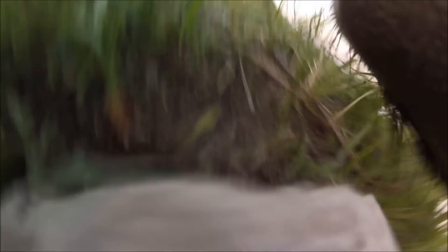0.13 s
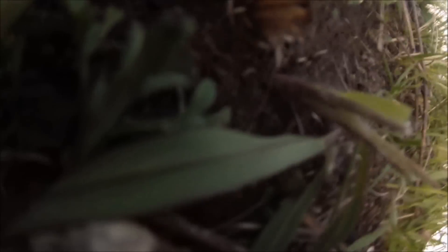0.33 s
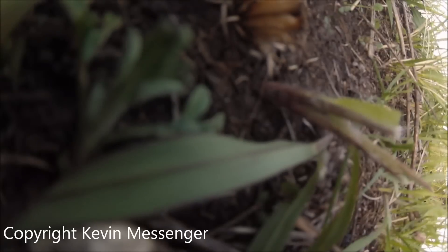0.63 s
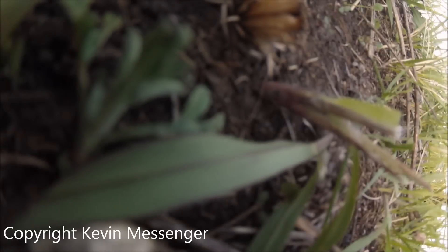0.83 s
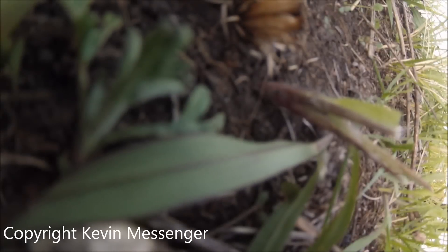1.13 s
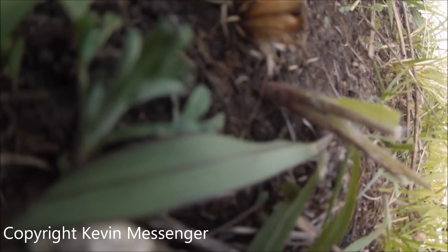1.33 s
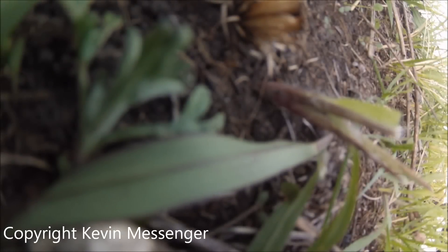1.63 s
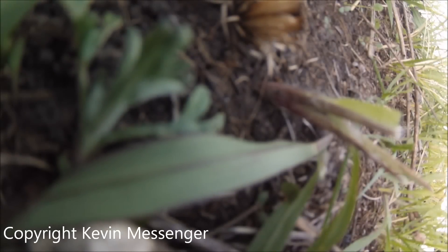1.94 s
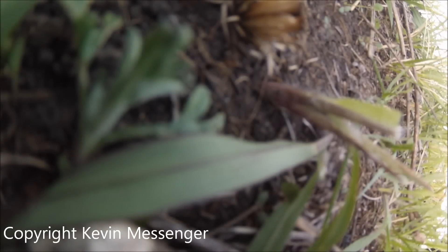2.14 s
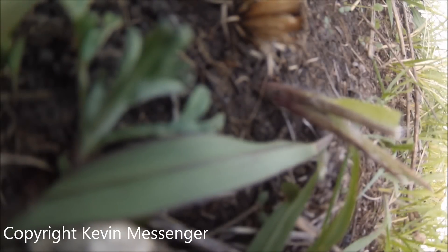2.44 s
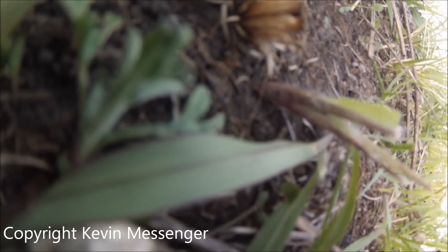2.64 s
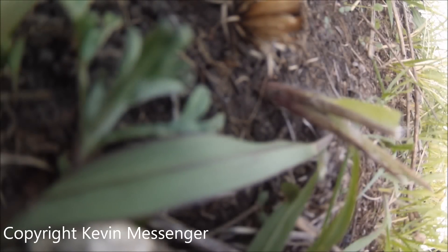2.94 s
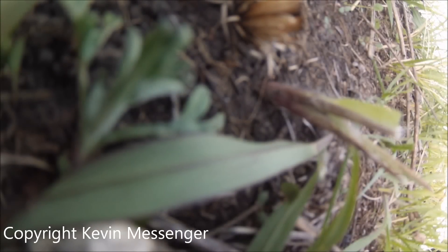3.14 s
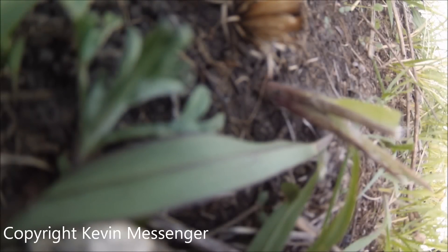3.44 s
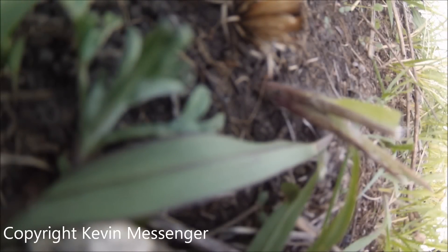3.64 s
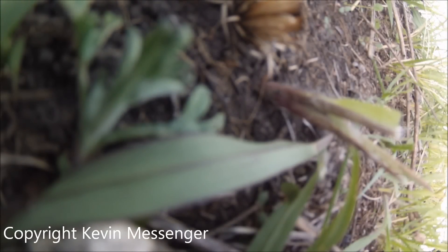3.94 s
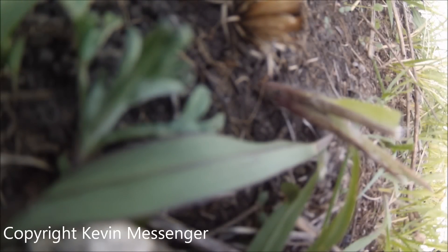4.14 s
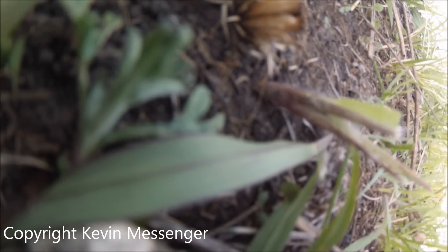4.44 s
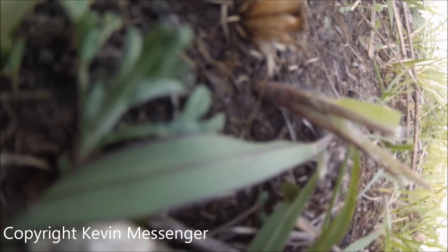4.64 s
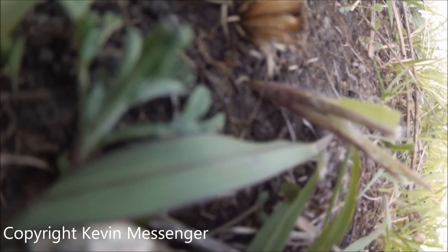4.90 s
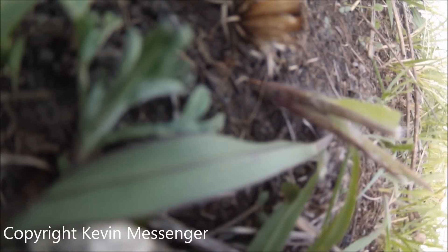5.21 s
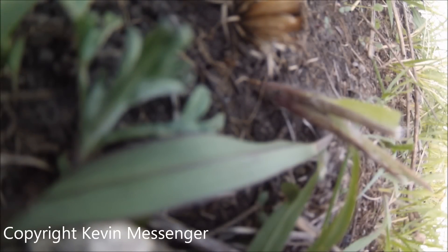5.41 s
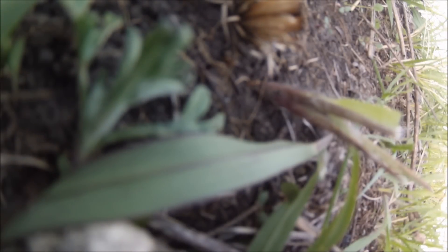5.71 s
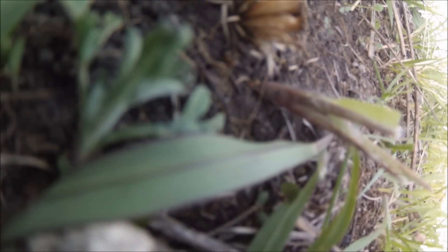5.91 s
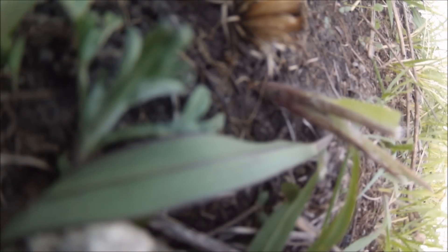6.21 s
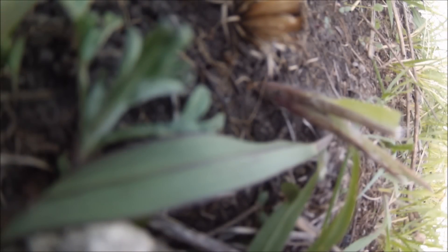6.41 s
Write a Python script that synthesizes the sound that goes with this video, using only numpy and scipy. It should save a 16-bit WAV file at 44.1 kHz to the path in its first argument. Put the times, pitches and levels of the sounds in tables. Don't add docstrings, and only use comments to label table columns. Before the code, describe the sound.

A small camera is knocked over with loud scraping, hollow thumps and cracks, then lies still while a plover gives rapid, shrill alarm calls.

```python
import sys
import numpy as np
from scipy import signal
from scipy.fft import rfft, irfft
from scipy.io import wavfile
from scipy.ndimage import uniform_filter1d, map_coordinates

SR = 44100
rng = np.random.default_rng(int(sys.argv[2]) if len(sys.argv) > 2 else 0)


def store_wav(level_fs):
    pcm = np.round(np.clip(np.atleast_2d(level_fs), -1, 1) * 32767)
    wavfile.write(sys.argv[1], SR, pcm.T.astype(np.int16))


def invert_db(x):
    u = np.asarray(x, float) / 20
    return 10 ** u


N = 289296
TIME = np.arange(N) / SR


def rms_one(x):
    return x / np.sqrt(np.mean(x ** 2) + 1e-20)


def in_time(rows, t):
    s, *columns = np.transpose(rows)
    return [np.interp(t, s, c) for c in columns]


def coloured(x, spectrum):
    hz, db = np.transpose(spectrum)
    log_hz = np.log(np.fft.rfftfreq(N, 1 / SR) + 1)
    gain = invert_db(np.interp(log_hz, np.log(hz), db))
    return rms_one(irfft(rfft(x) * gain, N))


def drift(rate_hz):
    r = np.exp(-2 * np.pi * rate_hz / SR)
    noise = rng.standard_normal(N + SR)
    return rms_one(signal.lfilter([1], [1, -2 * r, r * r], noise)[SR:])


def ring(clicks, hz, t60_s):
    r = np.exp(-np.log(1000) / (t60_s * SR))
    w = 2 * np.pi * hz / SR
    return signal.lfilter([0, np.sin(w)], [1, -2 * r * np.cos(w), r * r], clicks + 1e-18)


def clicks_at(seconds, gains):
    out = np.zeros(N)
    out[(np.asarray(seconds) * SR).astype(int)] = gains
    return out


RELEASE_S = .009
REST_HZ, DROOP_SHARE, DROOP_S = 3650, 0.66, .015


def arch(start, length, first, turning, last, turn, hold):
    t = np.arange(start, start + length + RELEASE_S / 2, 1 / SR)
    share = (t - start) / length
    glide = np.sin(np.pi / 2 * np.clip(share / turn, 0, 1) ** hold) ** 2
    bend = np.clip((share - turn) / (1 - turn), 0, 1) ** 2
    droop = DROOP_SHARE * (last - REST_HZ) * np.exp((t - start - length) / DROOP_S)
    return t, first + (turning - first) * glide + (last - turning) * bend - droop


MIXING = [(2, -1), (2, 1), (1, 1), (3, -1), (3, -2), (0, 3)]
MIXING_DB = [2, 4, -3.5, -22, -2.5, -18]
# time_s, level_db
NEARNESS = [(0, -35.5), (.475, -47.5), (.608, -37), (.781, -41), (.968, -45), (1.181, -53.5), (1.55, -62),
            (1.876, -58.5), (2.18, -52), (2.436, -47), (3.038, -46.5), (3.46, -45.5), (3.648, -47),
            (3.814, -46.5), (4.002, -42.5), (5.824, -43), (6.33, -42)]
# start_s, pitch_hz, level_db (against nearness)
LOWER = [(.608, 1080, -21), (.781, 1300, -14), (.968, 1207, -22.5), (1.181, 1300, -30), (2.18, 1100, -45),
         (2.436, 1040, -28.5), (2.636, 1099, -21.5), (3.46, 1071, -21), (3.648, 1160, -20),
         (3.814, 1212, -22), (4.002, 1090, -21.5), (4.664, 1075, -20), (4.82, 1087, -31.5),
         (5.036, 1050, -37), (5.272, 1026, -21.5), (5.644, 1077, -19), (5.824, 1095, -30),
         (6.33, 1093, -32)]
# pitch_hz, level_db
GROUND_ECHO = [(3430, -17), (3520, -1.5), (3600, -3), (3800, -1.5), (3950, -4.5), (4190, -14), (4320, -7),
               (4520, -3.5)]
# pitch_hz, level_db
FUNDAMENTAL = [(1720, -27.5), (1850, -22.5), (2000, -16), (2260, -9)]
LANDING_S = .44
THIRD_DB, AIR_DB, FLUTTER_DB, WOBBLE_HZ, ATTACK_S = -26, -3.0, 1.5, 7.0, .007
SCOOP_HZ, SCOOP_SHARE, SCOOP_S = 170.0, 0.2, .006
HIGH_EXIT_DB, HIGH_EXIT_S = -10.0, .012
EXIT_DB, EARLY_EXIT_S = -12.5, 0.0071
LOWER_CLIMB_HZ_PER_S, LOWER_ENTRY_S, LOWER_FADE_DB_PER_S = 450.0, 0.014, 30.5
CHOKE_HZ, CHOKE_DB_PER_S = 4200, 200.0
TAIL_HZ, TAIL_DB, TAIL_S = 200.0, 6, .014
SUM_FOLLOWS, SUM_LIFT_DB = 0.52, 1.5


def two_voices(t, hz, start, end, wobble, flutter, jitter, air):
    hz = hz - (SCOOP_HZ + SCOOP_SHARE * (hz[0] - REST_HZ)) * np.exp((start - t) / SCOOP_S)
    near_db = in_time(NEARNESS, start)[0]
    low_hz, low_db = in_time(LOWER, start)
    height = np.clip((hz.max() - 3850.0) / 400.0, 0, 1)
    forced = height * np.clip((near_db + 47.0) / 4.0, 0, 1)
    strain = np.clip((hz - 3800.0) / 510.0, .1, 1)
    tail = forced * np.exp((t - end) / TAIL_S)

    exit_db = EXIT_DB * np.exp((t - end) / EARLY_EXIT_S)
    echo_db = (start > LANDING_S) * in_time(GROUND_ECHO, hz)[0]
    main_db = near_db + echo_db + height * HIGH_EXIT_DB * np.exp((t - end) / HIGH_EXIT_S)
    fund_db = near_db + in_time(FUNDAMENTAL, hz / 2)[0] + exit_db
    mix_db = near_db + low_db + (1 - forced) * exit_db + TAIL_DB * tail
    mix_db += EXIT_DB * np.exp((start - t) / LOWER_ENTRY_S) - LOWER_FADE_DB_PER_S * (t - start)
    mix_db -= CHOKE_DB_PER_S * np.cumsum(np.clip((hz - CHOKE_HZ) / 600.0, 0, 1)) / SR

    low_hz = low_hz + LOWER_CLIMB_HZ_PER_S * (t - max(start, 0)) + TAIL_HZ * tail
    upper = np.pi * np.cumsum(hz + WOBBLE_HZ * wobble) / SR
    lower = 2 * np.pi * np.cumsum(low_hz + 45.0 * strain * jitter) / SR

    whistle = invert_db(main_db) * (np.sin(2 * upper) + invert_db(THIRD_DB) * np.sin(3 * upper))
    whistle += invert_db(fund_db) * np.sin(upper)
    mixed = sum(invert_db(db) * np.sin(a * upper + b * lower) for (a, b), db in zip(MIXING, MIXING_DB))
    sum_change = invert_db(SUM_FOLLOWS * echo_db + SUM_LIFT_DB) - 1
    mixed += sum_change * invert_db(MIXING_DB[1]) * np.sin(2 * upper + lower)
    mixed += invert_db(AIR_DB) * strain * air
    voice = whistle + invert_db(mix_db + FLUTTER_DB * flutter) * mixed
    rise = np.clip((t - start) / ATTACK_S, 0, 1)
    fall = np.clip((end - t) / RELEASE_S + .5, 0, 1)
    return np.sqrt(2) * voice * rise * fall


# start_s, length_s, first_hz, turning_hz, last_hz (second harmonic)
QUICK_CALLS = [(2.436, 0.12, 4223, 4264, 4670), (2.636, 0.14, 4307, 4383, 4610),
               (3.215, 0.16, 3890, 4447, 4300), (3.46, 0.13, 4004, 4210, 4200),
               (4.82, 0.097, 3570, 3454, 3610), (5.272, 0.1423, 3750, 4150, 3920),
               (5.468, 0.12, 3903, 3780, 3900), (5.824, 0.1, 3605, 3487, 3740)]
LINGERING_CALLS = [(0.781, 0.096, 4375, 4510, 4480), (0.968, 0.12, 3830, 4060, 4640),
                   (2.18, 0.17, 4126, 4380, 4550), (3.038, 0.11, 3960, 4400, 4430),
                   (4.186, 0.12, 3836, 3830, 3966), (4.352, 0.1, 3896, 3852, 3760),
                   (4.51, 0.1, 3743, 3840, 3726), (5.644, 0.11, 3840, 3748, 3864)]
SLOW_CALLS = [(0.608, 0.108, 4320, 4366, 4420), (1.876, 0.2, 3940, 4294, 4134),
              (2.86, 0.11, 4090, 4437, 4530), (3.648, 0.094, 3806, 3970, 3890),
              (3.814, 0.13, 3876, 4293, 4172), (4.002, 0.13, 3807, 3987, 4170),
              (4.664, 0.091, 3782, 3734, 3730), (5.036, 0.16, 3875, 4290, 4190)]
COVERED_CALLS = [
    (-.06, .115, 4300, 4215, 4120),
    (.475, .068, 4200, 4170, 4280),
]
# time_s, pitch_hz (second harmonic)
WAVERING_CALLS = [
    [(1.181, 3600), (1.243, 3705), (1.262, 3810), (1.286, 4150), (1.305, 4040), (1.333, 3780)],
    [(1.55, 3744), (1.571, 3760), (1.591, 3930), (1.635, 4030), (1.663, 3875), (1.708, 3945)],
    [(6.33, 4497), (6.352, 4547), (6.383, 3971), (6.417, 4115), (6.481, 4342), (6.52, 4286), (6.6, 4170)],
]
QUICK_TURN, LINGERING_TURN, SLOW_TURN = .31, 0.31, 0.62
QUICK_HOLD, LINGERING_HOLD, SLOW_HOLD = 1.12, 1.2, 1.5


def plover():
    out = np.zeros(N)
    wobble, flutter, jitter = drift(60.0), drift(30.0), drift(90.0)
    breath_band = signal.butter(2, [2000.0, 5600.0], "band", fs=SR, output="sos")
    air = rms_one(signal.sosfilt(breath_band, rng.standard_normal(N)))
    kinds = [(QUICK_CALLS, QUICK_TURN, QUICK_HOLD), (LINGERING_CALLS, LINGERING_TURN, LINGERING_HOLD),
             (COVERED_CALLS, LINGERING_TURN, LINGERING_HOLD), (SLOW_CALLS, SLOW_TURN, SLOW_HOLD)]
    calls = [arch(*row, turn, hold) for rows, turn, hold in kinds for row in rows]
    for curve in WAVERING_CALLS:
        t = np.arange(curve[0][0], curve[-1][0], 1 / SR)
        calls.append((t, uniform_filter1d(in_time(curve, t)[0], size=450, mode="nearest")))
    for t, hz in calls:
        start, end = t[0], t[-1] - RELEASE_S / 2
        inside = (t >= 0) & (t < TIME[-1])
        t, hz = t[inside], hz[inside]
        span = int(t[0] * SR) + np.arange(len(t))
        chance = [x[span] for x in (wobble, flutter, jitter, air)]
        out[span] += two_voices(t, hz, start, end, *chance)
    return out


# pitch_hz, level_db (per Hz)
SCRAPE = [(290, -38), (500, -13), (549, -14.5), (993, -7.5), (1170, -17.5), (1510, 0.5), (1930, -6),
          (2230, 1.5), (3390, -6.5), (6000, -21.5), (7800, -55), (13200, -120)]


def scrape(sizes):
    grains_per_s = 4000.0 * invert_db(4.5 * drift(80.0))
    grains = sizes * (rng.random(N) < grains_per_s / SR)
    return coloured(grains, SCRAPE)


# pitch_hz, level_db, t60_s
BOOM = [(227.5, 2.5, 0.033), (345.3, 3, 0.028), (428, -8, 0.012), (150, -3.5, 0.061)]


def shake(sizes):
    jolts = sizes * (rng.random(N) < 250.0 / SR)
    return rms_one(sum(invert_db(db) * ring(jolts, hz, t60) for hz, db, t60 in BOOM))


# start_s, length_s, level_db
HEAVES = [
    (0.012, .45, -29.5),
    (0.537, 0.052, -34),
]
HEAVE_EDGE_DB_PER_S = 700.5


def heave():
    lift = np.zeros(N)
    for start, length, db in HEAVES:
        outside_s = np.maximum(0, np.maximum(start - TIME, TIME - start - length))
        lift += invert_db(db - HEAVE_EDGE_DB_PER_S * outside_s)
    rumble = ring(ring(rng.standard_normal(N), 75.0, .06), 85.0, .06)
    return rms_one(rumble) * lift * invert_db(-5.0)


def struck(seconds, peak_db, modes):
    luck_db = rng.normal(0, 2.5, (len(seconds), len(modes)))
    out = np.zeros(N)
    for k, (hz, db, t60_s) in enumerate(modes):
        clicks = clicks_at(seconds, -invert_db(peak_db + db + luck_db[:, k]))
        out += ring(clicks, hz, t60_s) * (-1) ** k
    return out


# time_s, shake_db, scrape_db
FALL = [
    (0, -64, -74),
    (.03, -33.5, -37),
    (.06, -17, -18),
    (.133, -15, -18.5),
    (.16, -19, -25.5),
    (.295, -10, -22.5),
    (.335, -35.5, -32.5),
    (.385, -35.5, -27),
    (.45, -33, -45.5),
]
# time_s, shake_db, scrape_db
SETTLING = [
    (.5, -68, -58.5),
    (.525, -47, -40.5),
    (.56, -34, -41),
    (.605, -54, -64.5),
    (.63, -86, -89.5),
]
# start_s, boom_peak_db, crack_peak_db
BLOWS = [(0.057, -1, -17.5), (0.078, -15.5, -18), (0.087, -3.5, -17), (0.105, -13, -25.5),
         (0.131, -3.5, -4.5), (0.161, -6, -15), (0.182, -8, -16.5), (0.206, -11, -24), (0.21, -4.5, -13.5),
         (0.232, -6.5, -13.5), (0.269, -2.5, -12.5), (0.285, -7, -13.5), (0.289, -0.5, -9.5),
         (0.295, 5, -14), (0.339, -7.5, -7.5), (0.376, -15, -19), (0.385, -29.5, -21), (0.436, 9.5, -2.5),
         (0.515, -48, -43), (0.535, -34, -22), (0.549, -36, -41), (0.569, -33.5, -40), (0.579, -45, -38.5)]
# pitch_hz, level_db, t60_s
CRACK = [(1030, -5.5, .02), (1564.4, 1.5, .018), (2265, -0.5, .018), (3115, -3, 0.012),
         (3920, -17.5, 0.0067), (5042, -15.5, 0.025)]


def tumble():
    shake_db, scrape_db = in_time(FALL + SETTLING, TIME)
    sizes = invert_db(3.0 * np.minimum(rng.exponential(1, N), 5)) * rng.choice([-1, 1], N)
    s, boom_db, crack_db = np.transpose(BLOWS)
    felt = shake(sizes) * invert_db(shake_db - 3.5) + heave() + struck(s, boom_db - 3.5, BOOM)
    felt = signal.sosfilt(signal.butter(2, 45, "high", fs=SR, output="sos"), felt)
    cracks = struck(s + .001, crack_db - 2.0, CRACK)
    return scrape(sizes) * invert_db(scrape_db + 0.06) + felt + cracks


# pitch_hz, level_db (per Hz)
FIELD = [(15, -35.5), (25, -2), (139, 1), (191, -0.5), (331, -4), (845, -15.5), (1680, -20), (2210, -21),
         (3410, -22), (3730, -24), (4480, -24.5), (5900, -33.5), (7670, -71), (13000, -120)]
FIELD_DB = -61.5


def field():
    return coloured(rng.standard_normal(N), FIELD) * invert_db(FIELD_DB + .8 * drift(3.0))


# centre_s, pitch_hz, peak_db, length_s
STEPS = [(.62, 73.8, -45.5, 0.1), (0.7, 73.7, -47, 0.19), (0.755, 213, -43.5, 0.022),
         (0.905, 80, -42.5, 0.037), (1.02, 138, -47, 0.062), (1.06, 82.8, -48, 0.095),
         (1.114, 150, -46.5, 0.047), (1.164, 137.7, -38, 0.052), (1.214, 142, -46, 0.06),
         (1.246, 74.5, -54.5, 0.1), (1.51, 120, -52, 0.049), (1.544, 65.5, -50, 0.13),
         (1.679, 91, -56, 0.088), (1.74, 68.2, -54.5, 0.21)]


def steps():
    phase = 2 * np.pi * TIME + 0.0085 * drift(14.2)
    out = np.zeros(N)
    for centre, hz, db, length in STEPS:
        swell = np.cos(np.pi * np.clip((TIME - centre) / (1.36 * length), -.5, .5)) ** 2
        out += invert_db(db) * swell * np.sin(hz * phase)
    return out


# start_s, low_peak_db, middle_peak_db, high_peak_db
SNAPS = [
    (0.8994, -63, -49, -88),
    (1.1644, -68, -54, -53),
    (1.915, -61, -58, -77),
    (1.9529, -70, -44.5, -75),
    (2.5844, -75, -57.5, -78.5),
    (3.163, -45.5, -59, -80),
    (4.2691, -51.5, -53, -70),
    (6.2444, -68, -50.5, -57.5),
]
# pitch_hz, t60_s
SNAP_TONES = [(1300, .007), (2500, .005), (4400, .004)]


def snaps():
    s, *levels = np.transpose(SNAPS)
    return sum(ring(clicks_at(s, invert_db(db + 3.0)), hz, t60) for db, (hz, t60) in zip(levels, SNAP_TONES))


def scene():
    return np.tile(plover() + tumble() + field() + steps() + snaps(), (2, 1))


# pitch_hz, level_db (per Hz)
SIDE_HISS = [(18, -32.5), (30, -1.5), (262, -3), (342, -17), (395, -9), (9500, -20.5), (12400, -47.5),
             (20900, -120)]
SIDE_DB = -78.5


def side_hiss():
    return invert_db(SIDE_DB) * coloured(rng.standard_normal(N), SIDE_HISS)


def low_pass(x):
    return signal.sosfilt(signal.butter(12, 16580, fs=SR, output="sos"), x)


HELD_RATE, CUTOFF_HZ = 12000, 15300


def record(dry):
    band = signal.sosfiltfilt(signal.cheby2(14, 14, 6250, fs=SR, output="sos"), dry[0])
    low = map_coordinates(band, [np.arange(0, N, SR / HELD_RATE)], order=3)
    lift = .12
    low = np.convolve(low, [-lift, 1 + 2 * lift, -lift], "same")
    low = np.clip(low, -1.05, 1.05)
    held = signal.resample_poly(np.repeat(low, 4), 147, 160)[:N]
    held = signal.sosfilt(signal.ellip(10, .2, 70, CUTOFF_HZ, fs=SR, output="sos"), held)
    held = np.clip(np.pad(held, (0, N - len(held))), -1, 1)
    side = side_hiss()
    return low_pass(np.array([held + side, held - side]))


dry = scene()
out = record(dry)
store_wav(out)
```